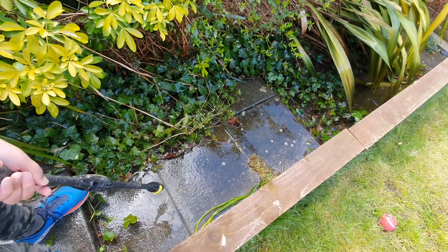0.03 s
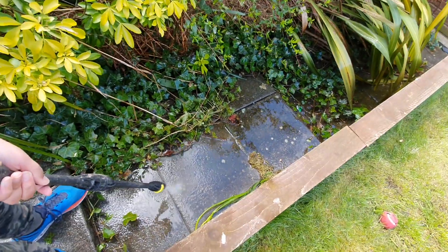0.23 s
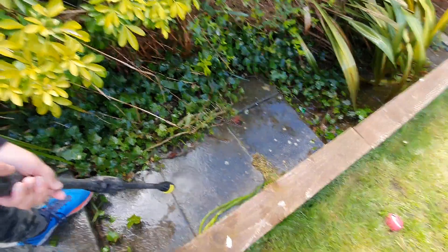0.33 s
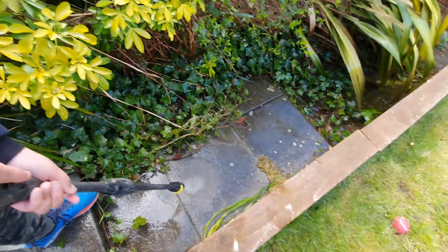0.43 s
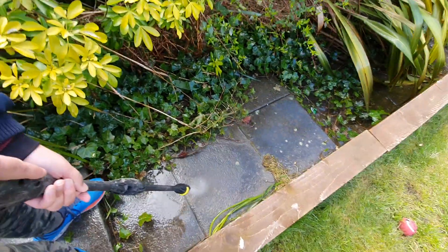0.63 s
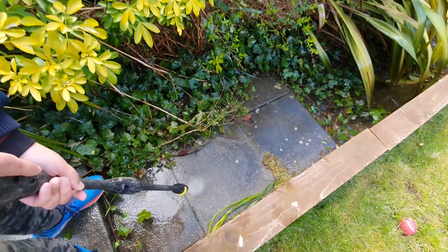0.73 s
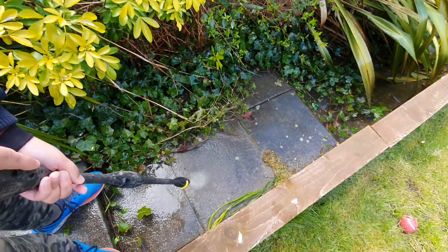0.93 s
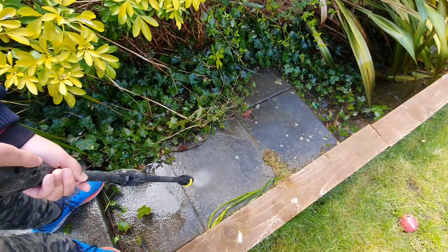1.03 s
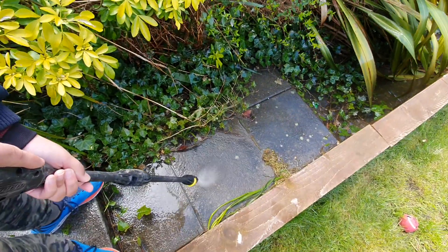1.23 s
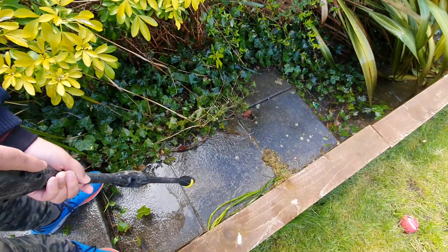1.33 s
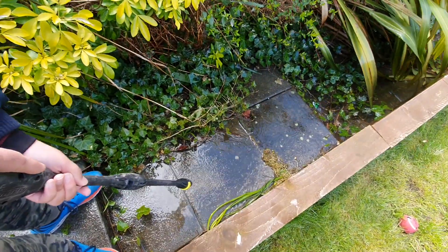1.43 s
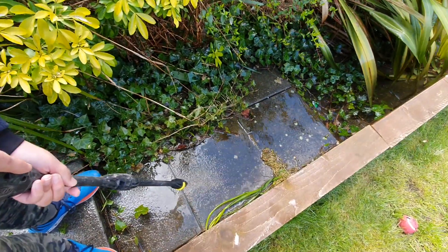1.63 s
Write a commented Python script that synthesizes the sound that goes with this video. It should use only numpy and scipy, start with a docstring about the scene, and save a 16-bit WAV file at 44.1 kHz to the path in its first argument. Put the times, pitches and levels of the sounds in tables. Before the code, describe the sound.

A pressure washer's motor whine falls briefly, then at 0.25 seconds the nozzle spits and the motor revs up. A bright jet hisses, sputters and spatters on paving, with a dull wind puff on the microphone around 1 second. At 1.3 seconds the spray stops, the pump gives a short rattle and the motor coasts with a falling whine. Another spit comes at about 1.7 seconds.

```python
"""A motor whines down, a nozzle spits, and a pressure washer's jet hisses onto garden paving.
The motor runs up with the trigger pull: as pressure builds, the water roars, sputters and spatters on
the stone. On release the jet stops, the pump rattles and the motor coasts with a falling fan whine,
until the next pull spits at the very end. Puffs of air bump the microphone."""
import sys
import numpy as np
from scipy import signal
from scipy.fft import rfft, irfft
from scipy.io import wavfile

SR = 44100
rng = np.random.default_rng(int(sys.argv[2]) if len(sys.argv) > 2 else 0)


def wav_out(sig):
    """Save sig, one row per channel (or a flat mono array), as 16-bit PCM at SR to the path in sys.argv[1]."""
    wavfile.write(sys.argv[1], SR, np.round(np.clip(np.atleast_2d(sig).T, -1, 1) * 32767).astype(np.int16))


N = 74970
TIME = np.arange(N) / SR
BINS = np.fft.rfftfreq(N, 1 / SR)
SPRAY_LAG_S, MOTOR_LAG_S = .0003178, .00036  # the right side hears it later
FLUTTER_HZ = 190
# Colour of water hitting stone: frequency_hz, level_db
HISS_SPECTRUM = [(2000, -35), (5000, -7), (6900, -11), (7600, -16), (8100, -1), (8450, 2), (8900, 1),
                 (9450, 7), (10450, 0), (11300, 8.5), (12200, 7), (13500, 9), (15000, 7), (15750, -1)]


def jet(speed, open_s=.243, close_s=1.29, build_s=.08):
    """Water hisses, splashes and roars on the slabs, driven by the pump's pressure."""
    # Colour of the splash: frequency_hz, level_db
    splash_spectrum = [(600, -6), (1000, -7), (1350, 4), (1550, 3), (1900, 2.5), (2450, -2), (2950, 4.5),
                       (3400, -1.5), (3800, 4.5), (4600, 5), (5200, -1.5), (6200, 0.5), (7000, 3),
                       (7600, 1), (16000, -3)]
    # Colour of the low roar: frequency_hz, level_db
    roar_spectrum = [(50, -33), (130, 0), (250, -1.5), (400, 5), (650, 2), (1000, 2), (1500, -12),
                     (2500, -15), (8000, -44)]
    held, released = np.maximum(TIME - open_s, 0), np.maximum(TIME - close_s, 0)
    pressure = (TIME > open_s) * from_db(-19 * np.exp(-held / build_s))
    breakup = drift(FLUTTER_HZ)
    hiss = jet_hiss(breakup) * speed ** 1.96
    splash = from_db(-29.5 + .4 * (drift(FLUTTER_HZ) + breakup / 2)) * noise(splash_spectrum)
    splash = (splash + from_db(-34.5) * spatter()) * speed ** .27 * pan(-.4)
    roar = from_db(-38) * noise(roar_spectrum, lag_s=.00023) * speed ** 1.4
    shutoff = from_db(-850 * released)
    settling = from_db(-353 * released)  # water in the air goes on landing
    left, right = pressure * (hiss * shutoff + (splash + roar) * settling)
    # A close reflection ripples the colour, differently on each side.
    return np.array([echo(left, delay_s=.0043, db=-12), echo(right, delay_s=.0037, db=-12)])


def jet_hiss(breakup, sputter_s=.003):
    """The hiss flutters as the jet breaks up, and sputters as slugs of water land."""
    # Hiss level as the lance moves over the slabs: time_s, level_db
    aim = [(.32, -9), (.375, -14.5), (.44, -16.5), (.6, -19.5), (.67, -20), (.73, -21), (.85, -20),
           (1.0, -22), (1.3, -22.5)]
    # Slugs of water: peak_s, boost_db
    sputters = [(0.349, 6.5), (.425, 5), (0.456, 5), (.527, 5), (0.638, 2.5), (.709, 9), (0.733, 8.5),
                (0.74, 3.5), (0.777, 3.5), (0.812, 8), (.827, 5), (.852, 3.5), (.942, 4), (1.161, 4.5),
                (1.207, 4), (1.25, 3)]
    sputter_db = sum(db * np.exp(-((TIME - s) / sputter_s) ** 2) for s, db in sputters)
    flutter = from_db(1.4 * breakup + .3 * drift(rate_hz=30) + sputter_db)
    return from_db(in_time(aim)) * flutter * (noise(HISS_SPECTRUM) + from_db(-11) * drops())


def drops(per_s=4200):
    """Single drops tick on the stone, each from its own spot; rms 1."""
    chance, size, polarity, spot = rng.random((4, N))
    size_db = np.minimum(-np.log(size), 6)
    left = (chance < per_s / SR) * from_db(size_db) * np.sign(polarity - .5)
    arrival = np.arange(N) + (2 * spot * SPRAY_LAG_S * SR).astype(int)
    right = np.bincount(arrival, left)[:N]
    return rms_one(irfft(rfft([left, right]) * from_db(per_bin(HISS_SPECTRUM) / 2), N))


def spatter(per_s=1100, pitches=20, ring_cycles=23.4):
    """Small drops ring briefly in the film of water, each pitch from its own spot; rms 1."""
    out = 0
    for hz in np.geomspace(1874, 7130, pitches):
        chance, size, spot = rng.random((3, N))
        hits = (chance < per_s / pitches / SR) * from_db(3 * np.minimum(-np.log(size), 4))
        decay = np.exp(-np.log(1000) * hz / (ring_cycles * SR))
        resonance = [1, -2 * decay * np.cos(2 * np.pi * hz / SR), decay ** 2]
        rings = signal.lfilter([hz / SR, 0, -hz / SR], resonance, hits + 1e-18)
        out = out + two_sides(rings, 2 * spot[0] * SPRAY_LAG_S)
    return rms_one(out)


def slaps():
    """Fat drops slap on the wet paving."""
    # Drop impacts: start_s, level_db, pitch_hz
    fat_drops = [(.652, -24, 3770), (.844, -23, 3820), (.981, -29, 4500), (1.058, -33, 2900)]
    return two_sides(bumps(fat_drops, rise_s=.0012), SPRAY_LAG_S)


def spits(attack_s=.006, hold_s=.0135, valve_hz=1970, valve_t60_s=.013):
    """The valve clicks open and the pressure stored in the hose escapes in a burst."""
    # Trigger pulls: start_s, level_db
    pulls = [(0.241, -16), (1.6955, -21)]
    # Colour of the burst: frequency_hz, level_db
    spit_spectrum = [(500, -10), (1200, -11.5), (1900, -4), (2450, -19), (3000, -13), (4000, -12.5),
                     (5200, -9.5), (6500, -7), (7600, -9), (8500, 5.5), (9600, 0), (11000, -0.5),
                     (14000, 7.5), (15800, 0.5)]
    burst = noise(spit_spectrum) * from_db(1.4 * drift(2 * FLUTTER_HZ))
    out = 0
    for s, db in pulls:
        age = np.maximum(TIME - s, 0)
        envelope = np.minimum(age / attack_s, 1) * from_db(-850 * np.maximum(age - hold_s, 0))
        click = np.sin(2 * np.pi * valve_hz * age) * from_db(-11.5 - 60 * age / valve_t60_s)
        leak = from_db(-8) * spike(s, width_s=.0025)  # water slips past as the valve lifts
        out = out + from_db(db) * ((envelope + leak) * burst + click)
    return out


def motor(shaft_hz, speed):
    """Pump and shaft tones sweep through the casing's resonances; the cooling fan whines and blows."""
    # Pump and shaft tones: shaft_multiple, level_db, speed_exponent
    tones = [(.265, -44.5, 26), (.8, -57, 11), (.91, -42.5, 3.5), (1.0, -38, 4), (1.2, -45.5, 0.5),
             (1.39, -41, 1.9), (1.51, -43.5, 4.5), (2.0, -51, 0.3), (4.0, -48, 0.3)]
    # Resonances of the casing: frequency_hz, gain_db
    casing = [(90, -1), (150, -7.5), (230, -17), (310, -6), (360, -1), (420, -5), (500, -12.5), (650, -15),
              (820, -7), (1100, -67)]
    # Colour of the cooling air: frequency_hz, level_db
    air_spectrum = [(30, -9), (80, 1.5), (130, -22), (190, -1), (350, -1.5), (550, -8), (800, -9),
                    (1200, -8), (1800, -8), (2700, -9), (3600, -19), (5000, -18.5), (8000, -28.5),
                    (15500, -24.5)]
    hum = 0
    for multiple, db, exponent in tones:
        hz = multiple * shaft_hz
        casing_db = np.interp(hz, *np.transpose(casing))
        hum = hum + from_db(db + casing_db) * speed ** exponent * tone(hz, rough=.15, width_hz=9)
    air = from_db(-39.5) * speed ** 1.04 * noise(air_spectrum, MOTOR_LAG_S)
    return two_sides(hum, MOTOR_LAG_S / 2) + two_sides(fan_whine(shaft_hz), MOTOR_LAG_S) + air


def fan_whine(shaft_hz, blades=11, rough=.55, width_hz=110, wall_delay_s=.1):
    """Blade tones in a haze of turbulence; a house wall returns the earlier pitch as a second tone."""
    # Swells of the whine: time_s, level_db
    swells = [(0, -38.5), (.04, -41), (.12, -51), (.2, -55), (.3, -57), (.335, -45), (.37, -43),
              (.42, -45.5), (.48, -52), (1.3, -56), (1.355, -50), (1.372, -42.5), (1.39, -50), (1.43, -53),
              (1.48, -45), (1.6, -43.5), (1.7, -44.5)]
    # Blade harmonics: blade_rate_multiple, level_db
    partials = [(1, 2), (2, -28), (3, -19.5), (4, -28), (6, -21), (7, -31)]
    blade_hz, level_db = blades * shaft_hz, in_time(swells)
    whine = sum(from_db(db) * tone(k * blade_hz, rough * k, width_hz * np.sqrt(k)) for k, db in partials)
    haze = from_db(-11.5) * tone(blade_hz, rough=.78, width_hz=325)
    earlier = TIME - wall_delay_s
    coast_hz = -160 * np.minimum(earlier, 0)  # the motor is already slowing at the start
    earlier_hz = blades * (np.interp(earlier, TIME, shaft_hz) + coast_hz)
    wall = from_db(np.interp(earlier, TIME, level_db) - 12) * tone(earlier_hz, rough, width_hz)
    pump_turns = .165 * np.cumsum(shaft_hz) / SR  # the pump is geared down
    throb = 1 + .35 * np.sin(2 * np.pi * pump_turns)
    return from_db(level_db) * throb * (whine + haze) + wall


def rattle():
    """A few dry shakes as the pump unloads."""
    # Shakes after the release: peak_s, level_db
    shakes = [(1.356, -43), (1.371, -36), (1.389, -37)]
    # Colour of the rattle: frequency_hz, level_db
    rattle_spectrum = [(100, -10), (190, 3), (400, 3), (800, 3), (1100, 4), (1700, 8), (3300, -5),
                       (4500, -17), (15000, -28)]
    envelope = sum(from_db(db) * spike(s, width_s=.0074) for s, db in shakes)
    return envelope * noise(rattle_spectrum, MOTOR_LAG_S)


def knocks():
    """Dull knocks as the motor runs up and down, and one faint ping as it coasts."""
    # Dull knocks: start_s, level_db, pitch_hz
    hits = [(.375, -33.5, 250), (.43, -31, 260), (.709, -27.5, 415), (1.352, -31, 443), (1.383, -31, 492),
            (1.414, -30, 378)]
    ping = bumps([(1.48, -50, 4590)], rise_s=.016)
    return two_sides(bumps(hits, rise_s=.0037) + ping, MOTOR_LAG_S / 2)


def wind():
    """Air on the microphone makes a light rumble and a few dull puffs."""
    # Colour of the rumble: frequency_hz, level_db
    rumble_spectrum = [(15, -24), (35, 0), (60, 10.5), (90, 15.5), (140, 12), (400, -14.5)]
    # Puffs of air: start_s, level_db, pitch_hz
    puffs = [(.125, -45, 71), (.208, -34.5, 62), (.555, -43, 64.8), (1.023, -20, 87.6), (1.082, -30, 82.5)]
    rumble = from_db(-53.5 + 1.5 * drift(rate_hz=29)) * noise(rumble_spectrum, lag_s=0)
    return bumps(puffs, rise_s=.0092) * pan(2) + rumble * pan(5.5)


def noise(spectrum, lag_s=SPRAY_LAG_S):
    """Coloured stereo noise, partly direct and partly diffuse; rms 1."""
    # Likeness of the two ears: frequency_hz, coherence
    likeness = [(60, 0.037), (150, 0.12), (330, 0.91), (1000, 0.96), (2200, 0.76), (4000, 0.22),
                (7000, 0.26), (15000, 0.39)]
    direct, *diffuse = rfft(rng.standard_normal((3, N)))
    alike = per_bin(likeness)
    delay = np.exp(-2j * np.pi * BINS * np.array([[0], [lag_s]]))
    field = np.sqrt(alike) * direct * delay + np.sqrt(1 - alike) * np.array(diffuse)
    return rms_one(irfft(from_db(per_bin(spectrum)) * field, N))


def tone(hz, rough, width_hz):
    """A gliding tone, part steady and part wavering; rms 1."""
    rough = np.clip(rough, 0, 1)
    waver = np.sqrt(1 - rough ** 2) + rough * (drift(width_hz) + 1j * drift(width_hz)) / np.sqrt(2)
    return rms_one((waver * np.exp(2j * np.pi * np.cumsum(hz) / SR)).real)


def bumps(rows, rise_s):
    """Pitched bumps that swell and die away."""
    out = 0
    for s, db, hz in rows:
        age = np.maximum(TIME - s, 0)
        envelope = (age / rise_s * np.exp(1 - age / rise_s)) ** 2
        out = out - from_db(db) * envelope * np.sin(2 * np.pi * hz * age)
    return out


def spike(peak_s, width_s):
    """A sharp, symmetric envelope."""
    return np.exp(-np.abs(TIME - peak_s) / width_s)


def drift(rate_hz):
    """A smooth random wobble; rms 1."""
    return rms_one(irfft(rfft(rng.standard_normal(N)) / (1 + (BINS / rate_hz) ** 2), N))


def echo(x, delay_s, db):
    """A sound and one reflection of it."""
    return x + from_db(db) * np.interp(TIME - np.round(delay_s * SR) / SR, TIME, x, left=0)


def two_sides(x, lag_s):
    """The right side hears the sound a little later."""
    return np.array([x, np.interp(TIME - lag_s, TIME, x)])


def pan(right_db):
    """Stereo gains: right up, left down."""
    return from_db([[-right_db], [right_db]])


def in_time(rows):
    """A control curve at every sample."""
    return np.interp(TIME, *np.transpose(rows))


def per_bin(points):
    """A spectrum table at every frequency."""
    hz, value = np.transpose(points)
    return np.interp(np.log(BINS + 1), np.log(hz), value)


def from_db(db):
    """Decibels to gain."""
    return 10 ** (np.asarray(db) / 20)


def rms_one(x):
    """Scale to unit power."""
    return x / np.sqrt(np.mean(x ** 2) + 1e-20)


def scene():
    """One motor speed drives the jet and the machine, over a light wind."""
    # The motor coasts, runs up, holds and coasts again: time_s, shaft_hz
    shaft_curve = [(0, 201), (.1, 181), (.2, 164), (.28, 158), (.33, 203), (.4, 257), (.45, 280),
                   (.53, 298), (.62, 324), (.71, 343), (1.27, 343.5), (1.32, 318), (1.37, 296), (1.44, 270),
                   (1.52, 243.6), (1.6, 222.3), (1.7, 200)]
    shaft_hz = in_time(shaft_curve)
    speed = shaft_hz / 343  # 1 at full speed
    return jet(speed) + slaps() + rattle() + spits() + motor(shaft_hz, speed) + knocks() + wind()


def record(dry, cutoff_hz=15800):
    """A steep low-pass cuts the very top."""
    return signal.sosfilt(signal.ellip(12, .1, 80, cutoff_hz, fs=SR, output="sos"), dry)


dry = scene()
out = record(dry)
wav_out(out)
```